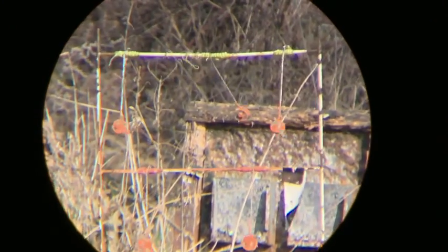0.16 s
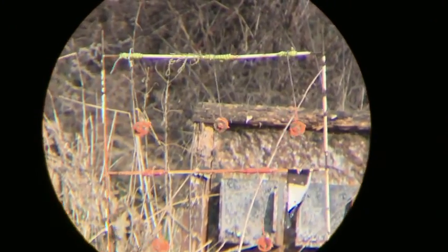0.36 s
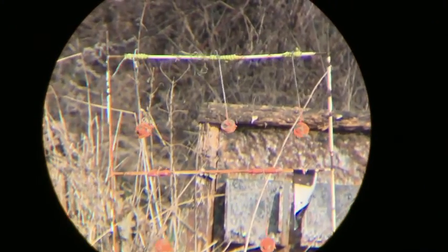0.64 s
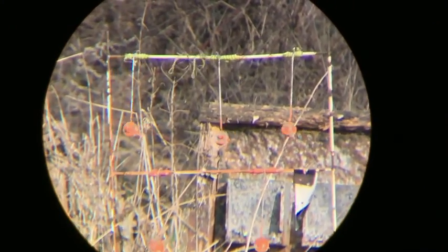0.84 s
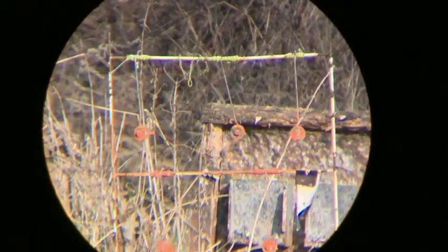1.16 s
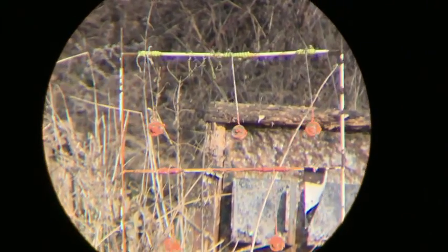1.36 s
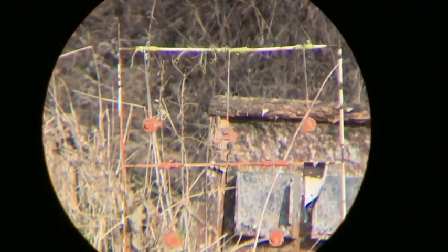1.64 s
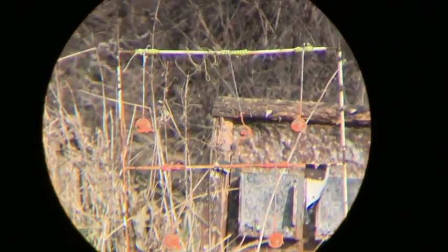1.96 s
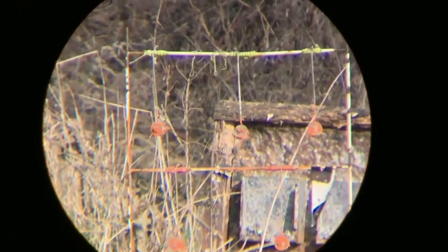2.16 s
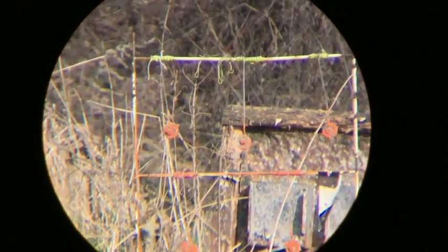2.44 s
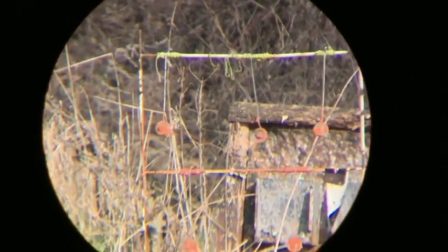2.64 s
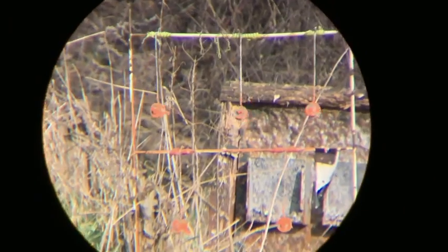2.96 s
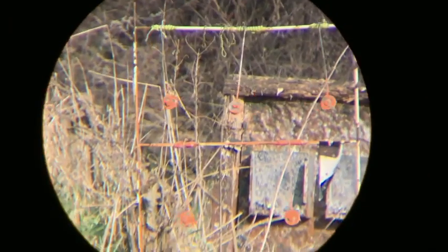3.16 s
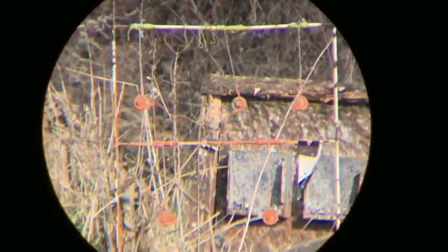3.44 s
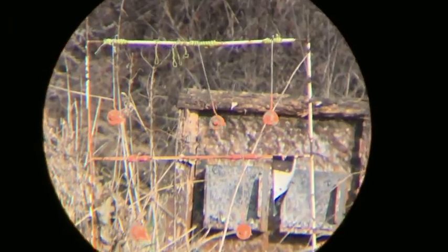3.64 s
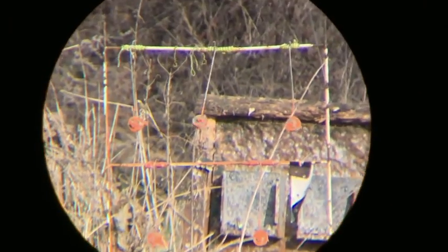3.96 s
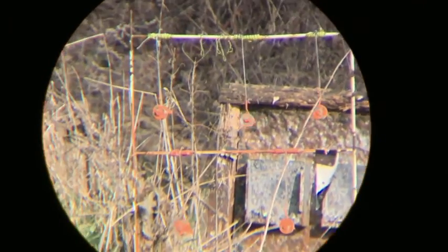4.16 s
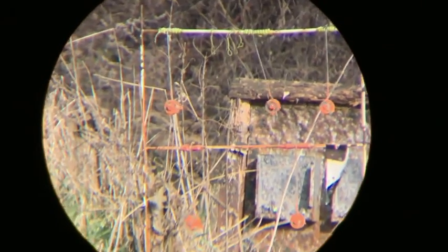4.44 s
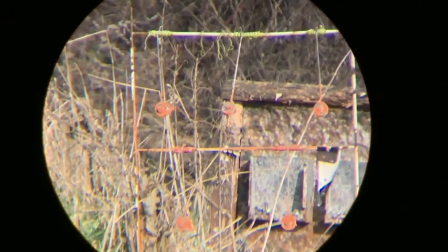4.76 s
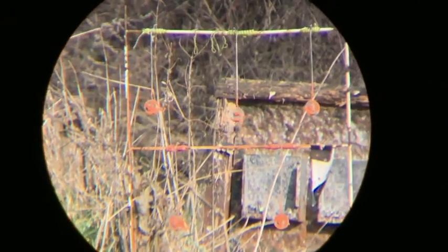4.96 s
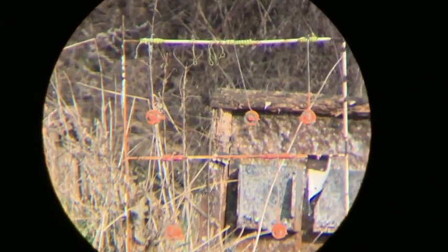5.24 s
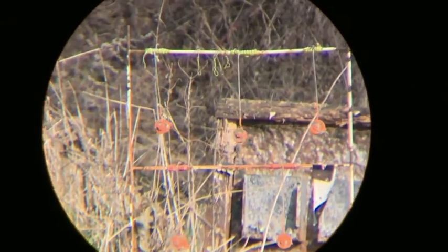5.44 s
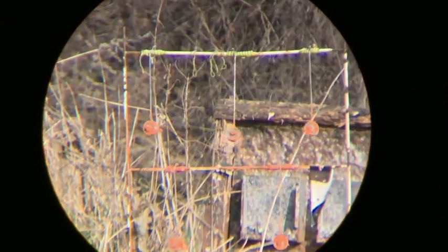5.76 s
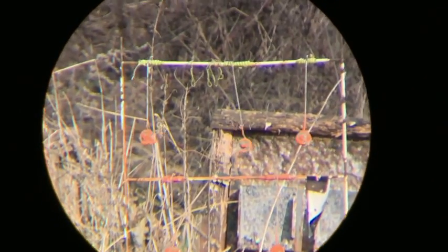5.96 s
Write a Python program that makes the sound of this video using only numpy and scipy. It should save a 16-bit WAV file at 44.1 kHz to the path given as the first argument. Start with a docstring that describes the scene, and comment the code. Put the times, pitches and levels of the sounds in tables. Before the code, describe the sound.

Heard through the gun itself, very close: soft outdoor hush and low rumble of hands on the stock, a few barely audible taps, then one sharp air-rifle shot with a short steel ring and puff. After a pause the lever is unlatched with thumps and clicks, hums low, clacks through its stroke, and a brisk bright swipe follows near the end.

```python
"""Over quiet open air and the rumble of hands on the stock, an air rifle takes a few light blows.
It fires once at 1.94 s, with a puff of air; then its lever is unlatched, humming, drawn and closed.
A microphone in a camera clamped to the scope hears each blow through the gun: a noise-burst crack,
decaying steel modes and a low-passed knock of the mount. Shaped noise makes the hands' swelling strokes
along the gun, with random ticks of the linkage, jolts of the whole gun and a brisk swipe near the end."""
import sys
import numpy as np
from scipy import signal
from scipy.fft import rfft, irfft, next_fast_len
from scipy.io import wavfile
from scipy.ndimage import uniform_filter1d

SR = 44100
rng = np.random.default_rng(int(sys.argv[2]) if len(sys.argv) > 2 else 0)


def wav_record(signal):
    """Record a signal, one row per channel, as 16-bit PCM in the file named by sys.argv[1]."""
    frames = np.transpose(np.atleast_2d(signal))
    bounded = np.clip(frames, -1, 1)
    # unit amplitude maps onto the largest positive 16-bit level
    quanta = np.round(bounded * 32767).astype(np.int16)
    wavfile.write(sys.argv[1], SR, quanta)


N = 269010
TIME = np.arange(N) / SR

# natural modes of the steel action: (frequency before detuning [Hz], relative level [dB], t60 [s])
STEEL_MODES = [(544, -38, 0.37), (1542, -11, 0.058), (1790, -23, 0.044), (2340, -20, .05),
               (2630, -22.5, .04), (2800, -29, 0.11), (1588, -31, .5), (2056, 0, .082), (4044, 0, .066),
               (5335, -30, .25), (5499, -4, .065), (5872, -8, .05), (6630, -22.5, 0.034),
               (7570, -13.5, 0.069), (9100, -28, 0.063), (8430, -11.5, 0.032), (10160, -20, 0.034),
               (11130, -15.5, 0.052), (11400, -20, .07), (13719, -19, .07)]
# colour of the trembling mount: (frequency [Hz], relative level [dB])
MURMUR_COLOUR = [(100, -9.5), (180, -6.5), (250, -5), (315, 3), (360, -4.5), (430, -22.5), (600, -31.5),
                 (1200, -43.5)]
RATTLE_DB = -23.5  # fine rattle after each crack, relative to its chatter before filtering


def undb(db):
    """Level definition: amplitude is ten to the power dB / 20."""
    return 10 ** (np.asarray(db) / 20)


def unit(x):
    """Normalisation by the root mean square, to rms 1."""
    return x / np.sqrt(np.mean(x ** 2))


def fade(t, t60):
    """Exponential decay: 60 dB down after t60, constant before time zero."""
    return np.exp(-np.log(1000) * np.maximum(t, 0) / t60)


def add(out, s, x):
    """Superposition: mix x into out from time s on."""
    start = int(s * SR)
    out[start:start + len(x)] += x[:N - start]


def spectrum(points, count, tilt_db=0):
    """Spectral envelope: log-frequency interpolation in dB, tilted per octave above 2 kHz."""
    hz = np.maximum(np.fft.rfftfreq(count, 1 / SR), 1)
    table = np.array(points)
    db = np.interp(np.log(hz), np.log(table[:, 0]), table[:, 1])
    return hz, db + tilt_db * np.log2(np.maximum(hz, 2000) / 2000)


def noise(points, tilt_db=0):
    """Spectral shaping: white noise filtered to a given colour and brought to rms 1."""
    size = next_fast_len(N, True)
    _, db = spectrum(points, size, tilt_db)
    shaped = rfft(rng.standard_normal(size)) * undb(db)
    return unit(irfft(shaped, size)[:N])


def causal(x, db):
    """Minimum phase: a folded cepstrum makes the dB response ring only after its excitation."""
    cepstrum = irfft(db * np.log(10) / 20)
    cepstrum[1:len(x) // 2] *= 2
    cepstrum[len(x) // 2 + 1:] = 0
    return irfft(rfft(x) * np.exp(rfft(cepstrum)))


def walk(rate):
    """Slow random modulation: smoothed held noise, about `rate` new values a second, spread near 1."""
    hold = max(int(SR / rate), 1)
    held = np.repeat(rng.standard_normal(N // hold + 1), hold)
    return unit(uniform_filter1d(held, hold))[:N]


def ring(modes, t):
    """Modal synthesis: a sum of decaying sines, each slightly detuned at random by the grip."""
    total = 0
    for hz, db, t60 in modes:
        detuned_hz = hz * (1 + 0.0011 * rng.standard_normal())
        total = total + undb(db) * fade(t, t60) * np.sin(2 * np.pi * detuned_hz * t)
    return total


def open_air(air_db=-62.5):
    """Broadband ambience: shaped noise whose level wavers slightly makes a soft outdoor hush."""
    # colour of open air: (frequency [Hz], relative level [dB])
    air_colour = [(100, 2.5), (450, 6.5), (700, 2), (1050, 8.5), (1500, 2.5), (1950, 2.5), (2300, -12),
                  (3500, -10), (8900, -35.5), (10500, -70), (15500, -21.5)]
    swell_db = .4 * walk(3)
    return noise(air_colour) * undb(air_db + swell_db)


def grip(scrape, steel_t60=0.14, steel_db=-24, sway_db=1.5, tremor_db=2.24):
    """Forced vibration: trembling hands drive stock, mount and main steel mode, more under effort."""
    # colour of the hands' rumble: (frequency [Hz], relative level [dB])
    rumble_colour = [(15, -31.5), (25, -14), (38, -1.5), (48, 5), (59, 4.5), (72, -0.5), (95, -16.5),
                     (140, -18.5), (200, -36), (400, -63)]
    rumble_db, murmur_db = -37, -47.5  # steady grip on the stock
    effort_db = 7  # murmur of the mount over the scrape that shakes it
    waver_db = 1.5 * walk(14)
    steel_hz = 2054
    rumble = noise(rumble_colour) * undb(rumble_db + sway_db * walk(9))
    # independent excitations add in power
    effort = np.hypot(undb(murmur_db), undb(effort_db) * scrape)
    tremble = effort * undb(tremor_db * walk(22))
    main_mode = ring([(steel_hz, 0, steel_t60)], TIME[:SR // 2])
    steel = unit(signal.fftconvolve(rng.standard_normal(N), main_mode)[:N])
    return rumble + tremble * (noise(MURMUR_COLOUR) + steel * undb(steel_db + waver_db))


def crack(t, tilt_db, part_hz, contact_ms, tail_db, part_db=7, part_octaves=0.24, tail_t60=0.11):
    """Contact noise: brief chatter and a fading rattle, filtered by the gun and one part's resonance."""
    # colour of metal contact through the gun: (frequency [Hz], relative level [dB])
    contact_colour = [(150, -27), (450, -6.5), (750, -5), (1100, -4.5), (1600, 0.5), (2700, 1), (3400, -5),
                      (4700, -6), (5800, 2), (7900, -11), (8900, 5.5), (9450, -7.5), (10000, -2),
                      (11500, -8.5), (12300, -9.5), (15500, -11.5)]
    age = t * 1000 / contact_ms  # in contact times
    rattle = undb(tail_db) * fade(t, tail_t60) * (1 - np.exp(-age))
    chatter = age * np.exp(1 - age) + rattle
    hz, db = spectrum(contact_colour, len(t), tilt_db)
    db = db + part_db * np.exp(-.5 * (np.log2(hz / part_hz) / part_octaves) ** 2)
    x = causal(chatter * rng.standard_normal(len(t)), db)
    # same energy as 10 ms at rms 1
    return x / np.sqrt(np.sum(x ** 2) / (SR / 100))


def action(crack_db=-2, low_db=0, high_db=-2, knock_db=-1, steel_rise_s=0.0014, mount_rise_s=0.0013,
           mount_top_hz=400):
    """Impact excitation: each blow cracks, rings the steel modes and shakes the springy camera mount."""
    # blows on the action, the shot at 1.94 s and the lever's catches after it; levels before the trims above:
    # (time [s], crack level [dB], crack tilt [dB per octave], resonance of the part struck [Hz],
    #  contact time [ms], steel ring level [dB], mount knock level [dB])
    blows = [(0.211, -59.5, -5, 3900, 1.1, -72, -72), (1.419, -53, -12, 1570, 0.78, -57, -52),
             (1.521, -53.5, -14, 1480, 0.59, -63, -25), (1.9389, -16.5, -6, 2660, 1.4, -12.5, -9),
             (3.266, -44, -18, 1600, 1.1, -35, -10.5), (3.351, -41, -8.5, 2950, 0.6, -45.5, -32),
             (3.361, -46.5, -18, 700, 0.89, -64, -33), (3.438, -44, -12.5, 4530, 1.2, -39, -50),
             (3.446, -39.5, 0, 8900, 0.58, -39.5, -55), (3.499, -41.5, -9, 930, 2, -49, -29.5),
             (3.5532, -43, -6.5, 2100, 2.1, -28, -55), (3.585, -40.5, -8, 1300, 2.6, -52, -34),
             (3.681, -28, 0, 9150, 1.3, -37, -24), (3.7394, -15.5, .5, 5300, 0.22, -20, -49),
             (3.7414, -15.5, 0.5, 1240, 1.13, -20, -17), (3.9748, -33, -1.5, 8300, 0.66, -35, -31),
             (4.0077, -32.5, -2.5, 2820, 0.54, -37, -25), (4.0228, -28, -7.5, 8900, 1.24, -24.5, -51),
             (4.0265, -17, -2, 9300, 1.2, -20, -5), (4.1956, -36, 2.5, 9200, 0.7, -41, -61),
             (4.2059, -32, -4.5, 5700, 0.83, -28, -40), (4.2415, -25.5, -5, 2700, 0.84, -23, -8.5),
             (4.2484, -24, -5, 5570, 2, -30, -21), (4.2705, -34.5, -0.5, 5500, 2.2, -27, -37),
             (4.3003, -29.5, -3.5, 8350, 1.7, -27.5, -35), (4.322, -28, -4, 2350, 1.5, -22, -25),
             (4.3534, -37, -2.5, 9150, 1.4, -41.5, -26), (4.362, -36.5, -7, 6000, 1.1, -54, -20),
             (4.39, -55, -1, 6000, 1, -66, -15.5), (4.4347, -53.5, -2, 1800, 1, -49, -24),
             (4.5084, -16, 1.2, 6270, 1.54, -19, -22.5), (4.6597, -35.5, -3, 1750, 0.93, -51, -12.5),
             (4.667, -31.5, -13.5, 1790, 0.95, -41, -9)]
    # modes of the camera mount: (frequency before detuning [Hz], relative level [dB], t60 [s])
    mount_modes = [(335.8, -8, 0.078), (309.2, -2, 0.063), (257, -21, 0.18)]
    high_ring_hz = 3300  # divides low modes from high
    high_ring_octaves = 2.5  # octaves of tilt at the lowest high mode
    metal, knocks, t = np.zeros(N), np.zeros(N), TIME[:2 ** 15]
    low = [mode for mode in STEEL_MODES if mode[0] < high_ring_hz]
    high = [mode for mode in STEEL_MODES if mode[0] >= high_ring_hz]
    for s, db, tilt_db, part_hz, contact_ms, ring_db, mount_db in blows:
        blow_crack = crack(t, tilt_db, part_hz, contact_ms, RATTLE_DB)
        add(metal, s, undb(db + crack_db) * blow_crack)
        # a dull blow hardly reaches the highest modes
        bright = []
        for hz, mode_db, t60 in high:
            octaves = high_ring_octaves + 2 * np.log2(hz / high[0][0])
            bright.append((hz, mode_db + min(tilt_db, 0) * octaves, t60))
        steel = undb(low_db) * ring(low, t) + undb(high_db) * ring(bright, t)
        add(metal, s, undb(ring_db) * steel * (1 - np.exp(-t / steel_rise_s)))
        knock = ring(mount_modes, t) * (1 - np.exp(-t / mount_rise_s))
        add(knocks, s, undb(mount_db + knock_db) * knock)
    # the springy mount passes little above its own resonance
    lowpass = signal.butter(6, mount_top_hz, fs=SR, output="sos")
    return metal + signal.sosfilt(lowpass, knocks)


def friction(hiss, scrape, grain_db=1.5, slip_db=3, steel_db=-4, steel_tilt_db=3, rise_s=0.00082,
             swipe_grain_db=1.0, muted_db=-14):
    """Stick-slip friction: skin, cloth and lever rub the gun as shaped noise and keep its steel ringing."""
    # colour of rubbing: (frequency [Hz], relative level [dB])
    rubbing_colour = [(150, 14.5), (330, 20.5), (520, -8.5), (1200, -6), (1750, 2.5), (2050, 7),
                      (2300, -4.5), (2700, 1), (3700, 0), (4500, -2.5), (5900, 0.5), (8000, -1.5),
                      (8900, 8), (9400, 0), (10800, -3.5), (12300, -6), (15500, -8)]
    # colour of the dull scrape: (frequency [Hz], relative level [dB])
    scraping_colour = [(200, 14), (550, -7), (1000, 2.5), (1650, 0), (2700, -0.5), (3400, -9.5),
                       (4600, -9.5), (5800, -6.5), (7500, -14), (15500, -34)]
    # brisk swipes and brushes: (time [s], level [dB], hold [s], t60 [s], tilt [dB per octave])
    swipes = [(1.837, -56, 0.014, 0.16, -1), (5.4639, -24, 0.0072, 0.23, 3), (5.919, -47, 0.016, 0.17, 5.5)]
    rub = noise(rubbing_colour) * hiss * undb(grain_db * walk(160))
    rub += noise(scraping_colour) * scrape * undb(slip_db * walk(220))
    for s, db, hold_s, t60, tilt_db in swipes:
        age = np.maximum(TIME - s, 0)
        envelope = (1 - np.exp(-age / rise_s)) * fade(age - hold_s, t60)
        rub += noise(rubbing_colour, tilt_db) * envelope * undb(db + swipe_grain_db * walk(250))
    # light, quick slips favour the higher modes; the hand mutes those near 5.4 kHz
    rubbed_modes = []
    for hz, db, t60 in STEEL_MODES:
        muted = 5200 < hz < 5600
        rubbed_modes.append((hz, db + steel_tilt_db * np.log2(hz) + muted_db * muted, t60))
    steel = ring(rubbed_modes, TIME[:SR // 2])
    steel = steel / np.sqrt(np.sum(steel ** 2))
    return rub + undb(steel_db) * signal.fftconvolve(rub, steel)[:N]


def discharge(rise_s=0.00066):
    """Jet noise: the piston drives air out behind the pellet, a sharp puff that decays at once."""
    # the puff: (time [s], level before rise and decay [dB], t60 [s])
    puff = (1.9395, -14, 0.029)
    # colour of the puff: (frequency [Hz], relative level [dB])
    puff_colour = [(300, 7), (600, -6), (1000, -10), (1350, -0.5), (1570, 10), (1950, -25), (2650, 5.5),
                   (3200, -18), (4100, -14.5), (5100, -6), (6100, -31.5), (8800, -21), (11500, -22),
                   (15500, -23)]
    s, db, t60 = puff
    age = np.maximum(TIME - s, 0)
    return noise(puff_colour) * undb(db) * (1 - np.exp(-age / rise_s)) * fade(age, t60)


def strokes():
    """Amplitude envelopes of hiss and scrape: a stroke sets in, swells or wanes, then decays at its end."""
    # strokes of the hand and lever along the gun, levels as reached at the end of the stroke:
    # (start [s], end [s], bright hiss level [dB], dull scrape level [dB], swell from start to end [dB])
    stroke_list = [(1.95, 2.396, -74.5, -71.5, -1.5), (2.4, 3.25, -60, -60, 14),
                   (3.27, 3.68, -68, -51, 6.5), (3.754, 4.225, -64, -79, -8.5), (3.978, 4.032, -70, -42, 5),
                   (4.23, 4.345, -62.5, -45, 3), (4.538, 5.242, -56.5, -59.5, 11.5),
                   (5.258, 5.43, -48.5, -57.5, 10), (5.477, 5.505, -53, -45.5, -7),
                   (5.55, 6.055, -67, -64.5, -0.5)]
    rise_s, t60 = .005, 0.26
    hiss, scrape = np.zeros(N), np.zeros(N)
    for start, end, hiss_db, scrape_db, swell_db in stroke_list:
        age = np.maximum(TIME - start, 0)
        swell = undb(swell_db * (np.minimum(age / (end - start), 1) - 1))
        shape = (1 - np.exp(-age / rise_s)) * swell * fade(TIME - end, t60)
        hiss += undb(hiss_db) * shape
        scrape += undb(scrape_db) * shape
    return hiss, scrape


def ticks(scrape, per_s=35, tick_db=0, scatter_db=4.5, tilt_db=-0.5, part_hz=8000, contact_ms=1.0):
    """Random impulse train: the linkage ticks louder and more often the harder it scrapes."""
    # per_s is the mean rate at the hardest scrape
    chance = per_s / SR * scrape / scrape.max()
    slips = (rng.random(N) < chance) * undb(tick_db + scatter_db * rng.standard_normal(N)) * scrape
    tick = crack(TIME[:2 ** 12], tilt_db, part_hz, contact_ms, RATTLE_DB)
    return signal.fftconvolve(slips, tick)[:N]


def thuds(rise_s=0.0017, shudder_rise_s=0.019):
    """Rigid-body motion: the gun bumps against the hands, swings a few slow cycles and shudders to rest."""
    # jolts that rock the whole gun: (time [s], level [dB], pitch of the first bump before detuning [Hz])
    jolts = [(3.266, -7.5, 255), (4.029, -13.5, 135), (4.242, -13.5, 143), (4.302, -9.5, 124),
             (4.326, -19.5, 168), (4.349, -13.5, 95), (4.377, -14.5, 257), (4.678, -10, 86),
             (5.474, -18, 227), (5.498, -16.5, 143)]
    bump_t60_s = .045
    # the slow swing after each bump, its level relative to the bump
    sway_hz, sway_db, sway_t60_s, sway_lag_s = 61.3, -7.5, 0.12, 0.0152
    shudder_db, shudder_t60_s = -21, 0.3  # trembling of the mount, relative to the bump
    out, shudder, t = np.zeros(N), np.zeros(N), TIME[:SR // 2]
    onset = 1 - np.exp(-t / rise_s)
    for s, db, hz in jolts:
        add(out, s, ring([(hz, db, bump_t60_s)], t) * onset)
        add(out, s + sway_lag_s, ring([(sway_hz, db + sway_db, sway_t60_s)], t) * onset)
        tremble = fade(t, shudder_t60_s) * (1 - np.exp(-t / shudder_rise_s))
        add(shudder, s, undb(db + shudder_db) * tremble)
    return out + shudder * noise(MURMUR_COLOUR)


def lever_hum():
    """Mass-spring resonance: the unlatched lever hums on its spring, a low note that builds and fades."""
    # the hum: (level before rise and decay [dB], frequency before detuning [Hz], t60 [s], rise [s])
    hum = (-14.5, 222.5, 0.52, 0.35)
    lever_free_s = 3.29
    db, hz, t60, rise_s = hum
    age = np.maximum(TIME - lever_free_s, 0)
    return ring([(hz, db, t60)], age) * (1 - np.exp(-age / rise_s))


def scene():
    """Linear superposition of all the sources at the microphone."""
    hiss, scrape = strokes()
    background = open_air() + grip(scrape)
    blows_and_shot = action() + discharge()
    handling = friction(hiss, scrape) + ticks(scrape)
    gun_motion = thuds() + lever_hum()
    return (background + blows_and_shot + handling + gun_motion)[None]


def record(dry):
    """Saturation and band limiting: the camera rounds the highest peaks and cuts the top."""
    top_hz = 15900
    rounded = 1.108 * np.tanh(dry / 1.081)
    lowpass = signal.ellip(8, .2, 70, top_hz, fs=SR, output="sos")
    return signal.sosfilt(lowpass, rounded)


dry = scene()
out = record(dry)
wav_record(out)
```